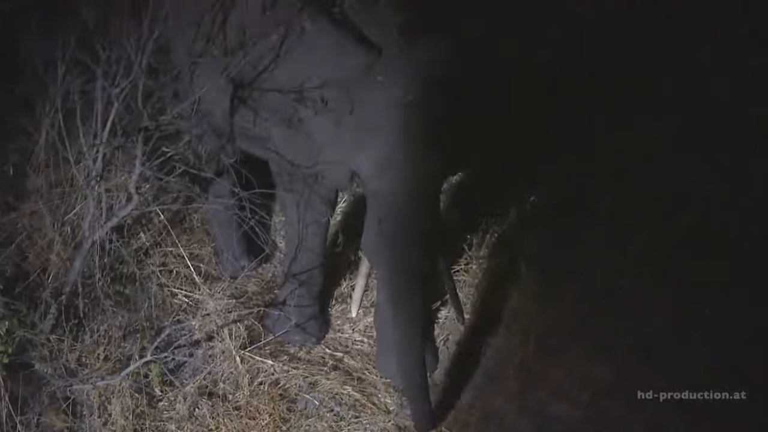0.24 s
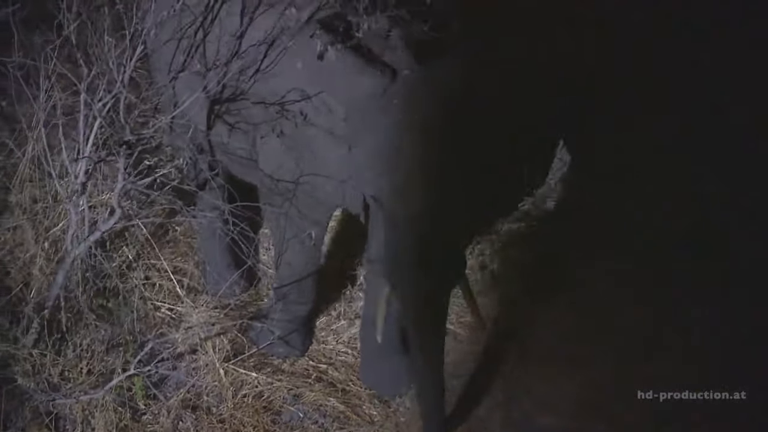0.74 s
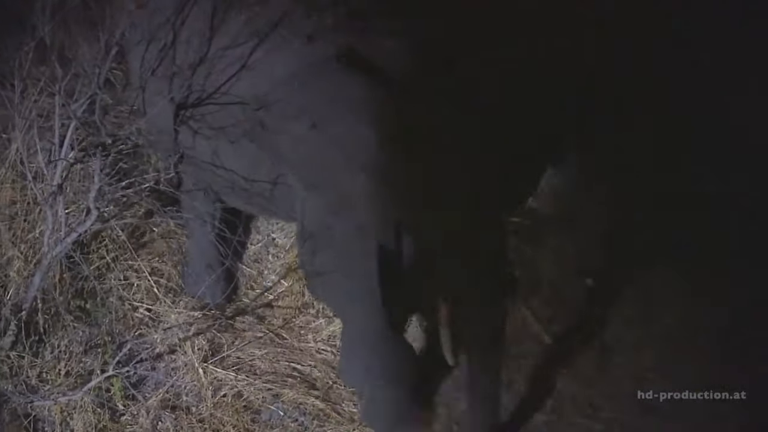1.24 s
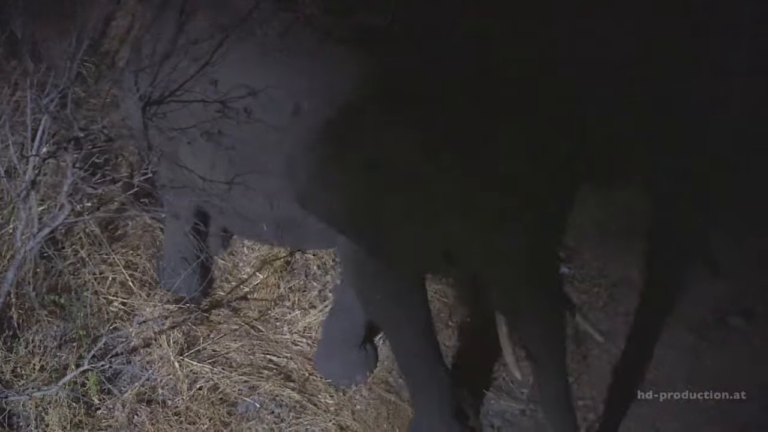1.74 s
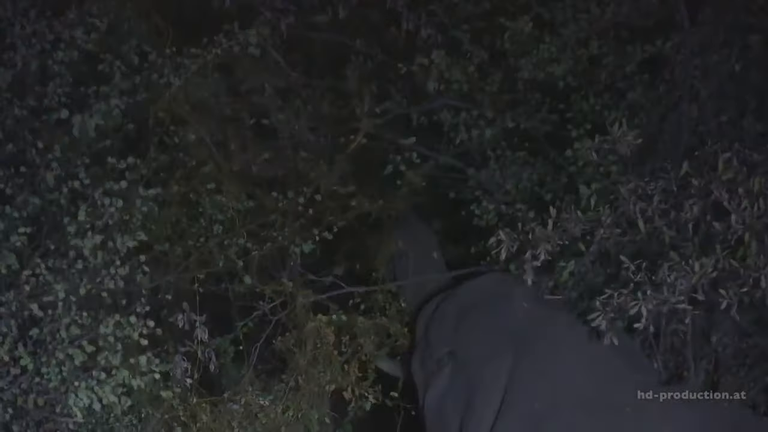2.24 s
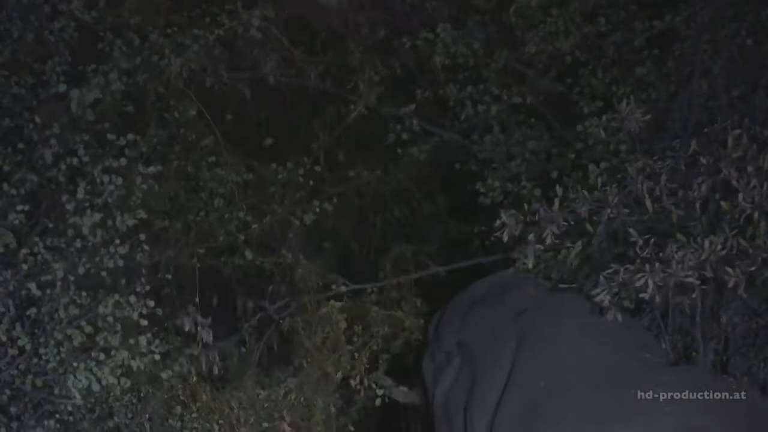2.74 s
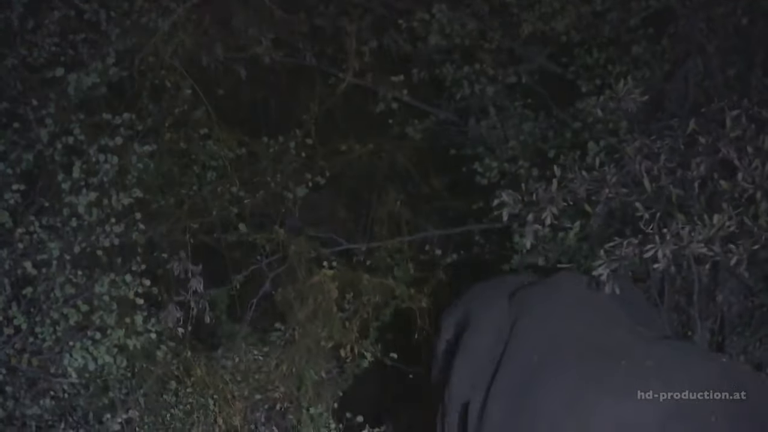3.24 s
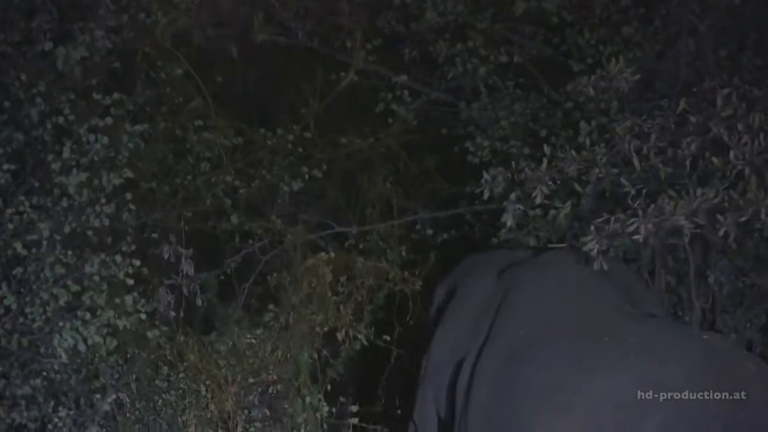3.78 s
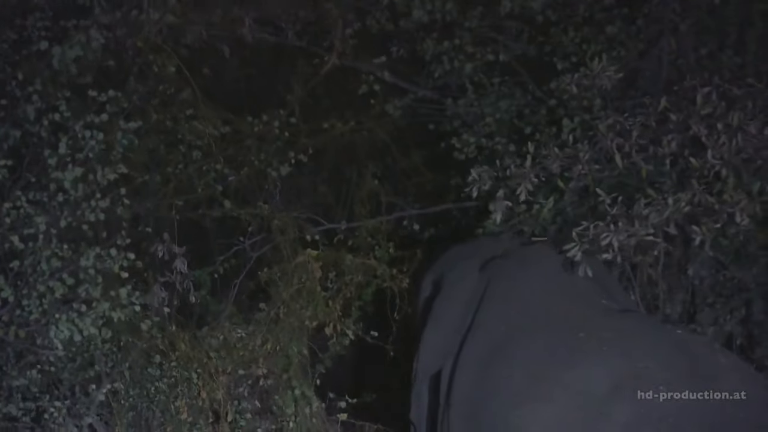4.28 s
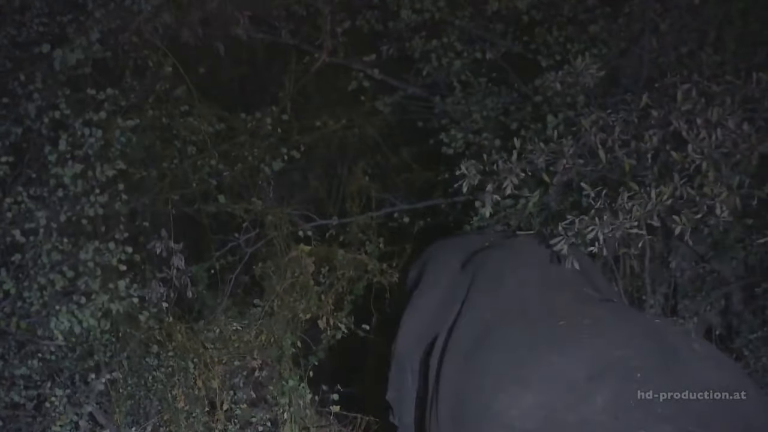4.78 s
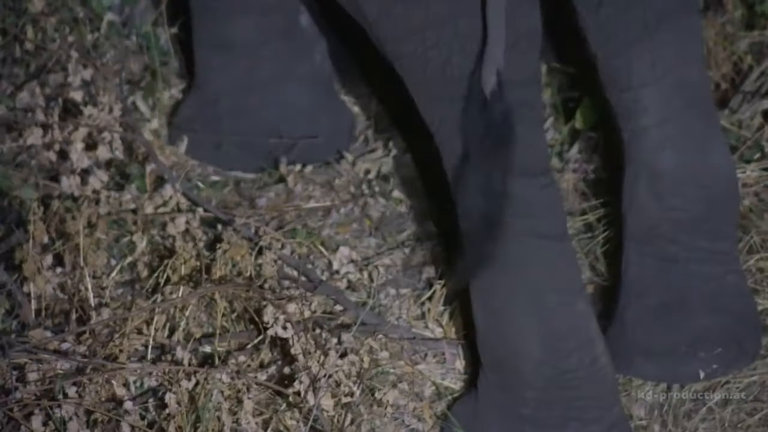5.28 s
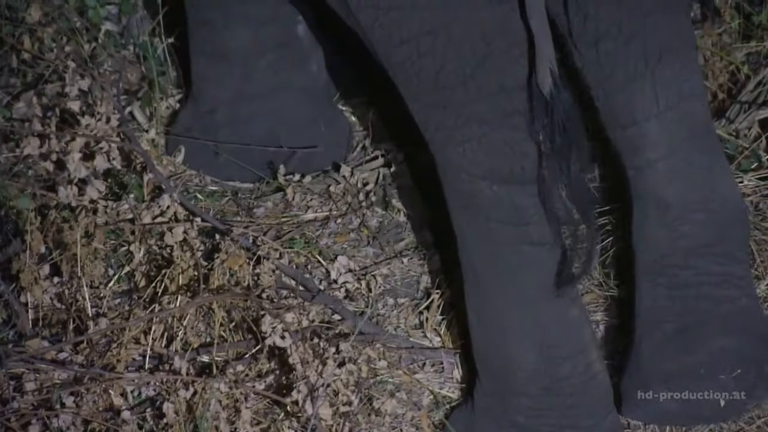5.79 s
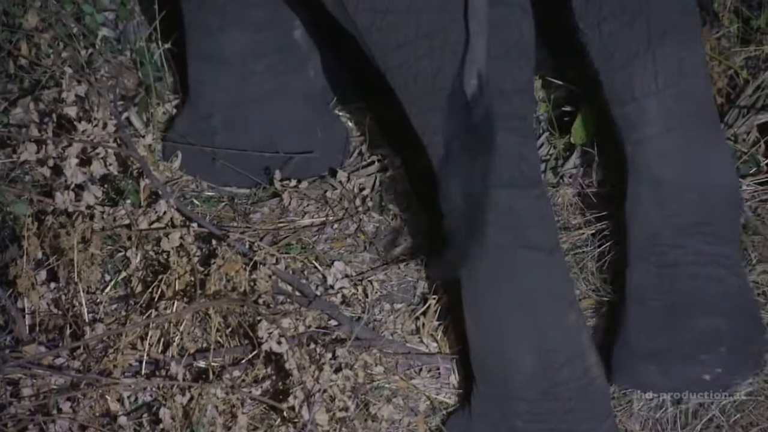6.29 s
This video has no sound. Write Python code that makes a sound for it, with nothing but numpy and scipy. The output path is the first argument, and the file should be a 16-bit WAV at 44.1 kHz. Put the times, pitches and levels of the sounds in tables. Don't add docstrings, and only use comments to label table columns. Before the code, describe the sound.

Twigs snap and dry leaves and grass crackle as an elephant feeds in night brush, with one thick branch breaking and low soft thumps.

```python
import sys
import numpy as np
from scipy import signal
from scipy.fft import rfft, irfft, next_fast_len
from scipy.io import wavfile
from scipy.ndimage import uniform_filter1d

SR = 44100
rng = np.random.default_rng(int(sys.argv[2]) if len(sys.argv) > 2 else 0)


def attenuation_scalar(level_db):
    decades = np.asarray(level_db, float) / 20
    return 10 ** decades


def generate_wav(sig):
    pcm = np.round(np.clip(np.atleast_2d(sig).T, -1, 1) * 32767).astype(np.int16)
    wavfile.write(sys.argv[1], SR, pcm)


N = 287664

# pitch_hz, level_db (per Hz)
NIGHT_AIR = [(12, -15), (20, 15.5), (37, -1), (79, -0.5), (130, -10.5), (328, -16.5), (441, -23.5),
             (512, -38), (700, -18), (910, -90)]
NIGHT_AIR_DB = -47.5
# pitch_hz, level_db
DRONE = [(376.8, -69.5), (436.0, -65.5)]

# peak_s, peak_db, pitch_hz, free_ring_s
PUSHES = [(0.393, -41.5, 77.5, 0.12), (0.55, -36.5, 72, 0.036), (0.617, -27.5, 84, 0.053),
          (0.679, -40, 82, 0.064), (0.744, -24.5, 75, 0.045), (0.815, -28, 75.3, 0.073),
          (0.951, -45, 75.8, 0.19), (1.647, -40, 62, 0.09), (1.798, -44, 79, 0.16), (2.271, -45, 71, 0.052),
          (2.741, -44, 75, 0.093), (2.878, -40, 86, 0.046), (3.003, -25.5, 74.8, 0.05),
          (3.045, -32, 64.4, 0.05), (3.173, -36, 69.6, 0.11), (3.255, -18, 78.8, 0.13),
          (3.479, -46, 74.5, 0.035), (3.547, -42, 79, 0.078), (3.64, -41, 65.6, 0.061),
          (3.736, -42.5, 81.5, 0.13), (3.969, -43, 74, 0.12), (4.301, -42, 83.3, 0.082),
          (4.438, -41, 89.5, 0.1), (4.585, -46, 80, 0.046), (4.789, -26, 81, 0.07),
          (4.878, -27.5, 78.4, 0.075), (4.98, -34, 79, 0.044), (5.056, -36.5, 78, .05),
          (5.139, -35.5, 70.5, 0.05), (5.232, -36, 69, 0.099), (5.35, -26.5, 82, 0.13),
          (5.424, -29.5, 76, 0.04), (5.485, -35, 80, 0.033), (5.63, -44.5, 75, 0.06),
          (5.723, -43.5, 75, 0.067), (5.95, -45, 79, 0.045), (5.994, -38, 78, 0.03),
          (6.129, -33, 79.6, 0.05), (6.15, -30.5, 77.5, 0.056)]
BOARDS_T60_S = 0.44

# start_s, tug_db, dryness_db (of what it holds), weight_db (on the stems)
TUGS = [(0.0, -47, -7, -10), (0.2, -44.5, -14, 0), (0.38, -42.5, -8, -1), (0.71, -47.5, -11, -3),
        (1.01, -41, -9, -2), (1.2, -50.5, -13, 0), (2.0, -44, -20, -1), (2.5, -50.5, -11, 0),
        (2.967, -42.5, 2, 2.5), (3.22, -43.5, -4, 5), (3.482, -49.5, 0, 4), (3.795, -38, -4, 4),
        (4.03, -43.5, -4, 8), (4.57, -36, -8, -1.5), (5.28, -44, -1, 2), (6.042, -40.5, -2.5, 9.5),
        (6.08, -47.5, 7.5, 4), (6.52, -48.5, 2.5, 2)]
# middle_s, length_s, change_db
JERKS = [(0.238, 0.1, -2), (0.427, 0.071, 0.5), (0.96, 0.18, -0.5), (1.525, 0.051, -0.5), (1.673, .12, 0),
         (2.065, 0.19, 2), (2.382, 0.56, 0), (2.73, 0.16, -3), (2.958, 0.077, -3), (3.335, 0.14, 3.5),
         (4.15, 0.33, -1), (4.458, 0.068, 3.5), (4.922, 0.093, -1), (5.2, 0.36, 3.5), (5.307, 0.035, -4),
         (5.537, 0.063, 0.5), (5.74, 0.25, -2), (5.923, 0.37, -2.5), (6.515, 0.055, -5), (0.736, 0.16, 0),
         (3.638, 0.081, 1.5)]
MIDDLING_TUG_DB = -45
# pitch_hz, width_hz, level_db
STEM_MODES = [(200, 205, -9), (438, 430, -9), (657, 510, -6), (1194, 900, -8.5), (1830, 700, -3.5)]
LEAF_MODES = [(2663, 610, 2.5), (3710, 3200, 7.5), (5400, 6100, 6.5)]
GRASS_MODES = [(6500, 3300, 5), (7600, 5700, 18.5), (10100, 1600, 9.5)]
CHAFF_MODES = [(12300, 8300, 16), (15100, 11000, -9)]
# level_db (at a middling tug), tug_share, dryness_share, weight_share (all dB per dB)
PLANTS = [
    (-51.5, 0.53, 0.077, 0.49),
    (-47, 0.9, 0.02, 0.067),
    (-43.5, 0.89, 0.14, .01),
    (-47, 1, 1, .01),
]

# start_s, pitch_hz, level_db
TAPS = [(0.2202, 390.0, -45), (1.0443, 1120.0, -51), (1.0978, 650.0, -59), (1.155, 566, -52),
        (1.2115, 517, -46.5), (1.2993, 563, -51), (1.9459, 660, -35), (2.118, 560.0, -48),
        (2.5545, 690.0, -49), (2.5819, 645, -45), (2.6595, 600.0, -48), (2.7361, 650.0, -56),
        (3.3976, 1110, -46), (3.7862, 726, -43), (4.0346, 590, -42), (4.4083, 600.0, -39.5),
        (4.53, 734, -44), (5.0112, 950.0, -41), (5.0903, 393, -44.5), (5.1428, 467, -47),
        (5.5673, 554, -44.5), (5.7931, 730.0, -44), (5.851, 980, -51), (6.2686, 430.0, -49.5),
        (6.298, 690.0, -47)]
# start_s, centre_hz, level_db, length_s
SCRAPES = [(.14, 640, -49.5, .12), (0.881, 420, -54, 0.047), (1.062, 606, -55, 0.053),
           (2.243, 264, -52, 0.07), (2.263, 130, -52, 0.07), (2.63, 160, -53, 0.044),
           (3.929, 525, -46, 0.074), (4.025, 324, -49, 0.082), (5.119, 484, -47, .04),
           (6.338, 1300, -50, 0.24), (6.363, 900, -61, 0.064)]
# start_s, pitch_hz, level_db, length_s
SQUEAKS = [(0.262, 2360, -44, 0.0084), (2.322, 5650, -37, 0.019), (5.583, 2290, -33.5, 0.017),
           (5.602, 2060, -44, 0.022), (6.331, 2840, -42, .012), (6.387, 1307, -42, 0.023),
           (6.43, 216, -38, 0.014)]

BRANCH_S, BRANCH_DB = 4.4188, -17.5
# pitch_hz, width_hz, level_db
BRANCH_MODES = [(690, 110, -12), (1300, 73, -6), (2040, 350, -24), (1670, 110, -2), (2650, 150, 3.5),
                (3450, 180, 3), (4000, 370, 5.5), (4440, 640, 0.5), (6000, 160, -4)]
# pitch_hz, width_hz, level_db
SPLINTER_MODES = [(223, 270, -14), (7500, 1350, 3.5), (10100, 990, -3)]

# start_s, pitch_hz, ring_db, wood_db
STICKS = [(0.6707, 4000, -27.5, -40), (.9009, 8500, -28, -46), (1.001, 2840, -23, -35.5),
          (1.042, 5990, -31.5, -43), (1.0733, 4340, -23.5, -43), (1.3317, 8800, -31.5, -41.5),
          (1.6663, 3670, -35.5, -37.5), (1.759, 2500, -29.5, -31), (1.845, 4220, -40, -43.5),
          (1.863, 1840, -41, -46), (1.9534, 7150, -20.5, -27), (2.03, 4000, -30, -33.5),
          (2.1234, 7600, -34, -36), (2.392, 1490, -43, -39.5), (2.4103, 1830, -34, -39),
          (2.5737, 3620, -31.5, -36), (2.624, 2670, -37, -39), (2.6366, 6000, -25.5, -35),
          (3.3586, 2560, -30, -30), (3.596, 5600, -18, -29), (3.683, 4270, -21.5, -24),
          (3.7468, 5500, -16, -28), (3.784, 6240, -46, -52), (3.958, 6890, -30, -46),
          (4.328, 6600, -28.5, -35), (4.5635, 2330, -32.5, -53), (5.486, 7800, -30.5, -37),
          (5.638, 5340, -28, -38.5), (5.7034, 9600, -26, -31.5), (5.8048, 1830, -31.5, -51)]
# start_s, pitch_hz, ring_db, splinters_db
STALKS = [(0.285, 7580, -36, -45), (0.8128, 5800, -23, -45), (0.9278, 6500, -27.5, -36),
          (1.062, 5500, -31, -39), (1.22, 6630, -34, -50), (1.3894, 8400, -26, -37),
          (1.6192, 2630, -36, -44), (1.733, 8050, -36, -30), (1.9906, 1990, -21.5, -29),
          (2.158, 7670, -34.5, -30), (2.5673, 8270, -46, -41.5), (2.609, 8400, -38, -49),
          (2.706, 6290, -41, -41), (3.1095, 6760, -38, -38), (3.381, 2830, -25, -37),
          (3.437, 2770, -38, -32.5), (3.4618, 6000, -28, -45), (5.3657, 8700, -18.5, -49),
          (5.731, 8200, -24.5, -34), (5.7719, 7650, -23.5, -29), (5.792, 5600, -26, -34),
          (5.854, 1720, -42, -48), (5.884, 4440, -50, -54.5), (6.4322, 9300, -36, -42)]
# start_s, pitch_hz, ring_db, crunch_db (against the crack)
SPRIGS = [(.0333, 4960, -38, -21), (0.1796, 6850, -38, -8), (0.399, 7900, -35.5, 6), (.507, 4350, -31, -4),
          (0.656, 5600, -32, -15), (0.8779, 5950, -33, -2), (1.19, 7060, -33, -4), (1.723, 7050, -33.5, 4),
          (1.9441, 1700, -25, -12), (2.428, 8250, -37, 4), (2.81, 8100, -31.5, -8),
          (3.002, 5300, -28.5, -6), (3.023, 2830, -30.5, -1), (3.3166, 4930, -27, -14),
          (4.221, 7600, -31.5, -8), (4.289, 6800, -32, -5), (4.3027, 3620, -28, -12), (4.407, 2700, -30, 4),
          (4.68, 7920, -33.5, -4), (4.7095, 2740, -31.5, -2), (4.981, 7580, -33, 4),
          (5.0096, 6800, -28, -3), (5.099, 6890, -37, -2), (5.963, 4020, -46, 2), (6.361, 1300, -44, 7)]
# start_s, pitch_hz, ring_db
TWIGS = [(0.5274, 8800, -24.5), (0.553, 5770, -32), (0.772, 6760, -24.5), (0.914, 6460, -33),
         (1.154, 7050, -32), (2.22, 4000, -36.5), (2.3113, 2560, -37), (2.554, 2710, -40.5),
         (3.052, 2900, -28.5), (3.1383, 4350, -37), (3.6757, 4910, -33), (4.058, 3000, -33.5),
         (5.7222, 1860, -29.5), (5.7571, 5770, -28.5)]
# start_s, level_db
ECHOES = [(0.287, -38), (.675, -33), (0.8186, -34), (1.0084, -29.5), (1.078, -32), (1.394, -38), (1.737, -40),
          (1.994, -22.5), (2.5803, -47.5), (2.6406, -21.5), (3.0055, -31), (3.32, -31), (3.39, -31.5),
          (3.5956, -33), (3.754, -35), (5.3685, -28), (5.7777, -43)]
ECHO_HZ = 7200
# start_s, level_db
KNOCKS = [(0.153, -37), (0.18, -37), (0.218, -40), (1.804, -32), (3.935, -35), (3.966, -37), (4.031, -40),
          (4.089, -38), (5.089, -40), (5.135, -36), (5.577, -38), (5.968, -45), (6.029, -29.5),
          (6.295, -44)]
# start_s, pitch_hz, level_db
TICKS = [(0.1623, 5700, -35.5), (0.2198, 5770.0, -35.5), (0.6036, 1830, -38), (0.952, 6890.0, -31.5),
         (1.0978, 5940.0, -43), (1.1114, 6290.0, -42), (1.211, 3100, -41), (1.4115, 6720.0, -34),
         (1.649, 3530.0, -43), (2.3814, 2000, -38), (2.934, 7020.0, -41), (3.1282, 2630.0, -42),
         (3.2494, 6240.0, -37), (3.932, 6500, -32), (4.184, 8790.0, -43), (4.1941, 9100, -45),
         (4.262, 5640.0, -37), (4.637, 7200, -37), (4.733, 7000, -29), (4.997, 8000, -32),
         (5.191, 7500, -36), (5.2123, 7150, -35), (5.706, 6500, -31), (5.85, 3010.0, -37.5),
         (6.4548, 7000, -42),
         (0.033, 1920, -44), (0.0392, 6420.0, -50), (0.105, 7580.0, -39), (0.1792, 6800.0, -42),
                  (0.2293, 2800.0, -45.0), (0.265, 2410.0, -51), (0.3031, 3960.0, -47.0),
                  (0.356, 3570.0, -40), (0.411, 1880, -32.5), (0.4167, 6200.0, -41), (0.583, 8570.0, -37),
                  (0.6671, 5500, -30), (0.7631, 7450.0, -46), (0.794, 3270.0, -44), (0.8426, 2670.0, -43),
                  (0.8786, 2580.0, -38.0), (0.958, 2370.0, -41), (1.066, 2840.0, -48),
                  (1.1188, 6460.0, -36), (1.206, 2370.0, -46), (1.2536, 7840.0, -43.0),
                  (1.3183, 1210.0, -49), (1.3617, 5640.0, -41), (1.466, 3490.0, -42), (1.503, 2540.0, -41),
                  (1.5164, 8350.0, -44), (1.0018, 7500, -25.5), (1.7595, 2650, -42), (1.7832, 2580.0, -45),
                  (1.841, 1720.0, -38.5), (1.87, 5860.0, -38), (1.895, 2710.0, -50), (1.913, 2580.0, -45),
                  (1.9183, 7060.0, -47), (1.9553, 2530, -24), (2.117, 5560.0, -39), (2.122, 2670, -33.5),
                  (2.1898, 3790.0, -41), (2.2681, 3660.0, -45), (2.329, 3790.0, -43), (2.4022, 1850.0, -38),
                  (2.4423, 5040.0, -39), (2.4697, 8350.0, -42), (2.4795, 3140.0, -44), (2.6387, 4500, -24),
                  (2.6677, 2540.0, -40), (2.6735, 3790.0, -39), (2.7301, 5470.0, -40), (2.7424, 2420, -42),
         (2.78, 2000, -42), (2.787, 2710.0, -41), (2.7998, 4520.0, -34.5), (2.8238, 7880.0, -41.5),
                 (2.894, 3660.0, -40), (2.9, 2760.0, -47.0), (2.9491, 7750, -33), (2.9551, 9200, -32),
                 (3.1277, 2630.0, -37), (3.1723, 1890.0, -44), (3.1796, 7280.0, -36), (3.2908, 7320.0, -43),
                 (3.4554, 2530, -34.5), (3.4682, 2560, -38), (3.5248, 1770.0, -42), (3.6228, 1660, -31.5),
                 (3.631, 2540.0, -42), (3.6929, 2700, -30), (3.7037, 2840.0, -30), (3.7463, 3530, -19.0),
                 (3.7832, 5510.0, -44), (3.8959, 2670.0, -31.5), (3.9249, 3080, -37), (3.9385, 2760.0, -33),
                 (4.0142, 8400.0, -51), (4.193, 5340.0, -42), (4.3075, 3880.0, -41), (4.398, 8230.0, -31),
                 (4.5909, 3920.0, -36), (4.6785, 8010.0, -36), (4.765, 2150.0, -41), (4.83, 2560, -37.5),
                 (4.9815, 7760, -36), (5.045, 2710.0, -42), (5.1044, 3620, -32.5), (5.143, 2670.0, -41.0),
                 (5.1583, 3450.0, -42.0), (5.1715, 1770.0, -39), (5.2239, 2890.0, -40),
                 (5.4674, 3010.0, -39), (5.5163, 8790.0, -35), (5.5262, 4580, -38), (5.7536, 7700, -35),
                 (5.8567, 1720, -42), (5.8833, 9600, -38), (5.964, 2950, -42), (5.9987, 2670.0, -39),
                 (6.0785, 10100, -48), (6.1718, 2630.0, -47), (6.1932, 2760.0, -50), (6.2381, 3960.0, -42),
                 (6.2967, 8740.0, -42)]


def band(f, hz, width):
    return 1j * f * width / (hz ** 2 - f ** 2 + 1j * f * width)


def unit(x):
    return x / np.sqrt(np.mean(x ** 2, axis=-1, keepdims=True))


def add(out, s, sound):
    i = max(int(s * SR), 0)
    out[i:i + len(sound)] += sound[:N - i]


def walk(rate):
    hold = int(SR / rate)
    steps = np.repeat(rng.standard_normal(N // hold + 1), hold)
    smooth = uniform_filter1d(uniform_filter1d(steps, hold), hold)
    return unit(smooth[:N])


def cracks(shape, spread_db):
    size_db = spread_db * np.minimum(rng.exponential(size=shape), 3.9)
    return unit(rng.standard_normal(shape) * attenuation_scalar(size_db))


def linger(grains, t60):
    return np.sqrt(signal.lfilter([1], [1, -attenuation_scalar(-120 / (t60 * SR))], grains ** 2))


def night(hiss_db=-62):
    f, t = np.fft.rfftfreq(N, 1 / SR), np.arange(N) / SR
    hz, db = np.transpose(NIGHT_AIR)
    colour = attenuation_scalar(np.interp(np.log(f + 1), np.log(hz), db, right=-90)) * (f > 8)
    gusts = attenuation_scalar(1.5 * walk(16) + .4 * walk(3))
    air = unit(irfft(rfft(rng.standard_normal(N) * gusts) * colour, N)) * attenuation_scalar(NIGHT_AIR_DB + 1.2)
    drone = 0
    for hz, db in DRONE:
        drone = drone + attenuation_scalar(db + 2 + 2 * walk(7.4)) * np.sin(2 * np.pi * hz * t + walk(4.8))
    drone = drone * np.clip((2.9 - t) / 0.21, 0, 1)
    hiss = unit(irfft(rfft(rng.standard_normal(N)) * band(f, 10500, 12000), N))
    return air + drone + attenuation_scalar(hiss_db) * hiss


def platform(push_s=0.03, lead_s=0.01865, damp_s=0.029):
    t, out = np.arange(SR // 2) / SR, np.zeros(N)
    swell = np.sin(np.pi / 2 * np.clip(t / push_s, 0, 1)) ** 2
    decay = attenuation_scalar(-60 * np.clip(t - push_s, 0, 1) / BOARDS_T60_S)
    for s, db, hz, free_s in PUSHES:
        damped = np.cos(np.pi / 2 * np.clip((t - free_s) / damp_s, 0, 1)) ** 2
        add(out, s - lead_s, attenuation_scalar(db) * swell * decay * damped * np.sin(2 * np.pi * hz * t))
    return out * attenuation_scalar(1.2 * walk(40))


def rustle(shared_db=6.0, own_db=3.5, own=0.9):
    flicker_db, smear_t60 = 1.4, .006
    s, effort_db, dry_db, weight_db = np.transpose(TUGS)
    t = np.arange(N) / SR
    size = next_fast_len(N)
    f = np.fft.rfftfreq(size, 1 / SR)
    tug_db = .4 * walk(30) + .8 * walk(90)
    for middle, length, db in JERKS:
        tug_db = tug_db + db * np.exp(-(2 * (t - middle) / length) ** 2)
    shared, out = linger(cracks(N, shared_db), smear_t60), 0
    kinds = (STEM_MODES, LEAF_MODES, GRASS_MODES, CHAFF_MODES)
    for modes, (base_db, tug, dry, weight) in zip(kinds, PLANTS):
        level_db = base_db + tug * (effort_db - MIDDLING_TUG_DB) + dry * dry_db + weight * weight_db
        plant = 0
        for hz, width, db in modes:
            loudness = np.hypot(shared, own * linger(cracks(N, own_db), smear_t60))
            grains = rng.standard_normal(N) * loudness * attenuation_scalar(tug_db + flicker_db * walk(20))
            ringing = irfft(rfft(grains, size) * band(f, hz, width) ** 2, size)[:N]
            plant = plant + attenuation_scalar(db) * unit(ringing)
        out = out + unit(plant) * attenuation_scalar(np.interp(t, s, level_db))
    return out


def taps(width=0.45):
    t, out = np.arange(1024) / SR, np.zeros(N)
    f = np.fft.rfftfreq(len(t), 1 / SR)
    for s, hz, db in TAPS:
        hit = rng.standard_normal(len(t)) * attenuation_scalar(-60 * t / 0.016)
        tap = irfft(rfft(hit) * band(f, hz, width * hz) ** 2)
        add(out, s - .0015, attenuation_scalar(db) * tap / np.std(tap[:240]))
    return out


def scrapes(width=0.68):
    t, out = np.arange(8192) / SR, np.zeros(N)
    f = np.fft.rfftfreq(len(t), 1 / SR)
    for s, hz, db, length in SCRAPES:
        rub = unit(irfft(rfft(cracks(len(t), 2.0)) * band(f, hz, width * hz) ** 2))
        add(out, s, attenuation_scalar(db) * rub * np.sin(np.pi * np.clip(t / length, 0, 1)))
    return out


def squeaks():
    out = np.zeros(N)
    for s, hz, db, length in SQUEAKS:
        t = np.arange(int(length * SR)) / SR
        wobble = .1 * np.cumsum(rng.standard_normal(4096))[:len(t)]
        add(out, s, attenuation_scalar(db) * np.sin(np.pi * t / length) * np.sin(2 * np.pi * hz * t + wobble))
    return out


def branch(scatter_t60=0.089, scatter_db=-1.5, tear_t60=0.0066, late_cycles=1.8):
    tear_s, low_hz = .002, 1000
    t = np.arange(8192) / SR
    f = np.fft.rfftfreq(len(t), 1 / SR)
    rise, out = np.clip(t / tear_s, 0, 1) ** 2, np.zeros(N)
    for hz, width, db in BRANCH_MODES + SPLINTER_MODES:
        tear = rng.standard_normal(len(t)) * rise * attenuation_scalar(-60 * t / tear_t60)
        ringing = unit(irfft(rfft(tear) * band(f, hz, 2.12 * width) ** 2))
        late_s = late_cycles / hz if hz < low_hz else 0
        add(out, BRANCH_S + late_s, attenuation_scalar(BRANCH_DB + db - 15.5) * ringing)
    tail = rng.standard_normal(len(t)) * rise * attenuation_scalar(-60 * t / scatter_t60)
    scattered = unit(irfft(rfft(tail) * band(f, 4900, 13000) ** 3))
    add(out, BRANCH_S + tear_s, attenuation_scalar(BRANCH_DB + scatter_db - 10) * scattered)
    return out


def breaks():
    sticks = [(s, hz, db, wood_db, db - 69, -17) for s, hz, db, wood_db in STICKS]
    stalks = [(s, hz, db, db - 12.5, fine_db, -16) for s, hz, db, fine_db in STALKS]
    sprigs = [(s, hz, db, db - 10.5, db - 17.5, crunch_db) for s, hz, db, crunch_db in SPRIGS]
    twigs = [(s, hz, db, db - 36, db - 47, -18) for s, hz, db in TWIGS]
    echoes = [(s, ECHO_HZ, db, db - 21, db - 12, -14) for s, db in ECHOES]
    knocks = [(s, 600, db - 15, db - 7.5, db - 30, -9) for s, db in KNOCKS]
    small = TICKS
    ticks = [(s, hz, db - 0.5, db - 12, db - 28, -14) for s, hz, db in small]
    return sticks + stalks + sprigs + twigs + echoes + knocks + ticks


def snaps(scatter_t60=0.16, grain_db=1.5, creak_db=-14, body_db=-5, click_t60=0.0016, crack_t60=0.017,
          parting_db=11, ground_gain=.35, ground_s=0.001102):
    creak_s, rise_s = .0014, .0002
    s, hz, ring_db, wood_db, fine_db, scatter_db = np.transpose(breaks())[:, :, None]
    t = np.arange(4096) / SR - creak_s
    f = np.fft.rfftfreq(len(t), 1 / SR)

    click = attenuation_scalar(-60 * t / click_t60)
    crack = attenuation_scalar(body_db - 60 * t / crack_t60)
    tail = attenuation_scalar(scatter_db - 2.5 - 60 * t / scatter_t60)
    after = np.clip(t / rise_s, .2, 1) * (click + crack + tail)
    shape = np.where(t < 0, attenuation_scalar(creak_db) * (1 + t / creak_s), after)

    side, bounce = rng.random((len(s), 2)).T[:, :, None]
    ground = 1 + ground_gain * np.exp(-2j * np.pi * f * (0.2 + bounce) * ground_s)
    at_parting = np.arange(len(t)) == int((creak_s + rise_s) * SR)
    parting = np.sign(side - .5) * attenuation_scalar(parting_db - 5.4 * bounce) * at_parting
    fade = np.clip((t[-1] - t) / .03, 0, 1)
    burst = rfft((cracks((len(s), len(t)), grain_db) * shape + parting) * fade)

    ring = band(f, hz, 0.15 * hz) * band(f, 1470, 5600) + attenuation_scalar(-12.5) * band(f, hz, 1.84 * hz) ** 2
    ring = ring + attenuation_scalar(-7) * band(f, 3290, 9500) ** 2 * band(f, 3400, 10600)
    wood = band(f, 900, 2660) ** 2 + attenuation_scalar(-8) * band(f, 217, 330) ** 2
    fine = band(f, 9500, 9500) ** 2 / (1 + (1j * f / 14000) ** 2 + 1.2j * f / 14000)

    sound = 0
    for colour, db in ((ring, ring_db - .7), (wood, wood_db), (fine, fine_db - .7)):
        part = irfft(burst * ground * colour)
        sound = sound + attenuation_scalar(db) * part / np.std(part[:, 40:240], axis=1, keepdims=True)
    out = np.zeros(N)
    for start, one in zip(s[:, 0], sound):
        add(out, start - creak_s, one)
    return out


def scene():
    background = night() + platform() + rustle()
    stems = taps() + scrapes() + squeaks()
    return np.tile(background + stems + branch() + snaps(), (2, 1))


def top_cut(x):
    return signal.sosfilt(signal.butter(12, 16670, fs=SR, output="sos"), x)


def record(dry):
    clipped = np.clip(dry, -.83, .83)
    treble_cut = signal.ellip(10, .2, 60, 15700, fs=SR, output="sos")
    return top_cut(signal.sosfilt(treble_cut, clipped))


dry = scene()
out = record(dry)
generate_wav(out)
```